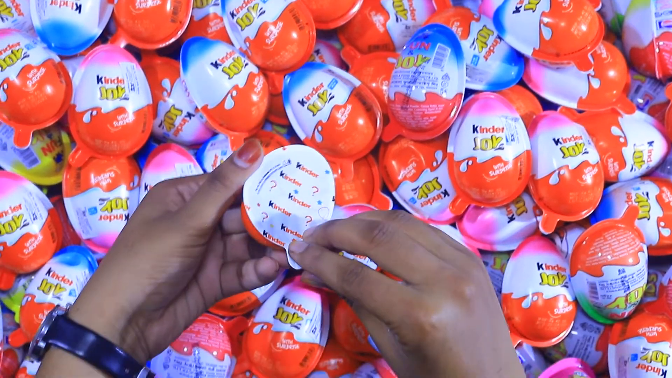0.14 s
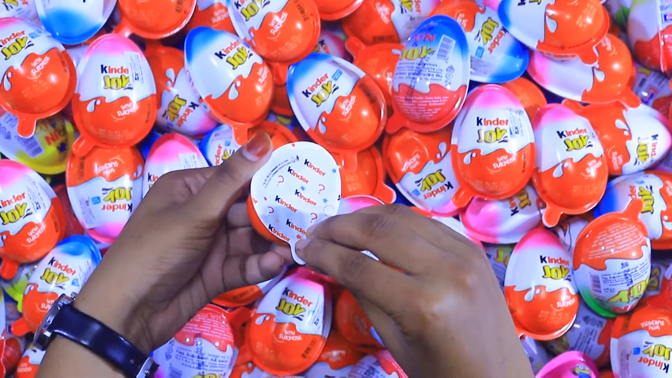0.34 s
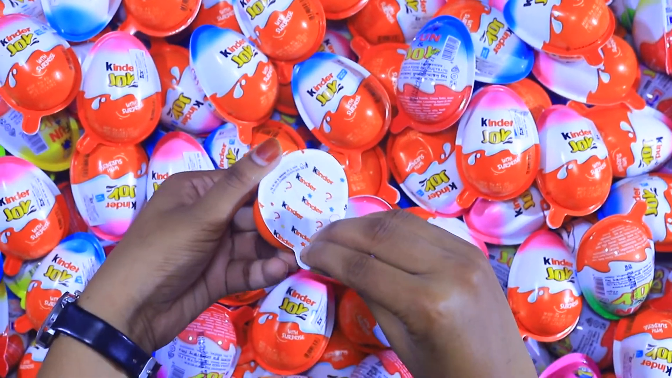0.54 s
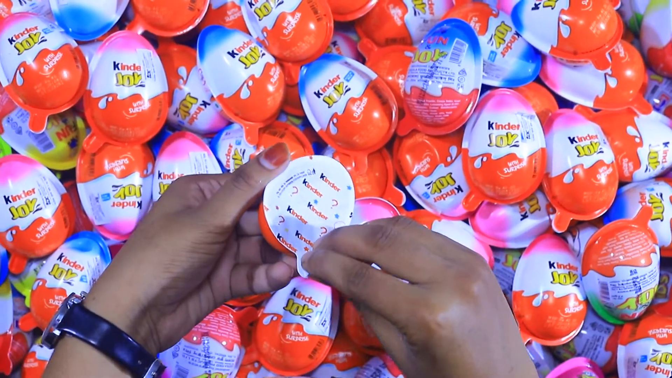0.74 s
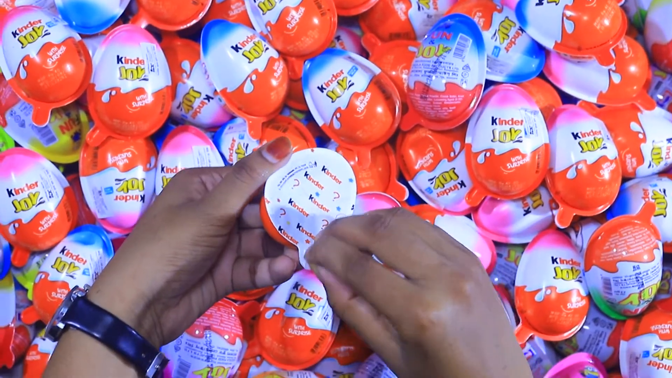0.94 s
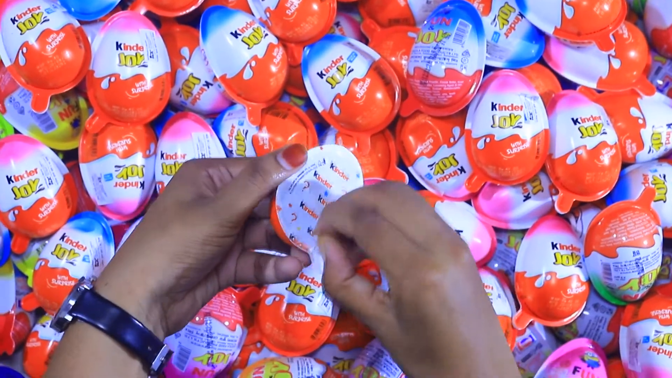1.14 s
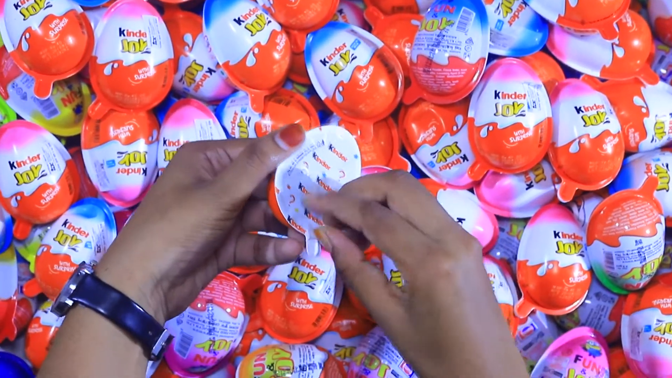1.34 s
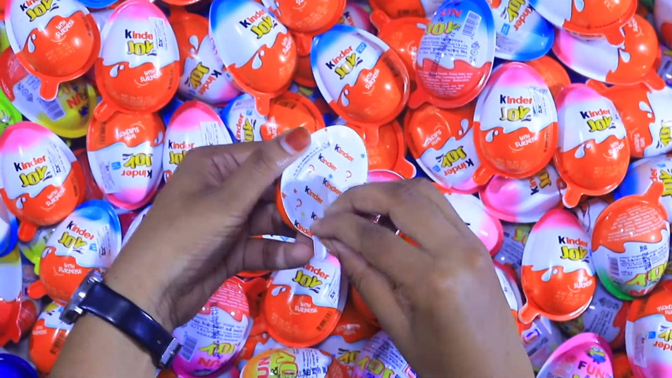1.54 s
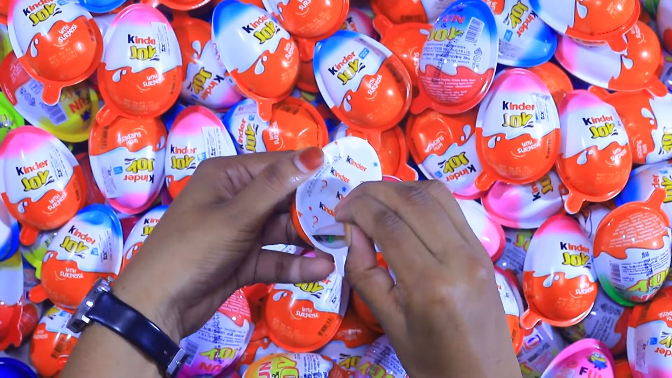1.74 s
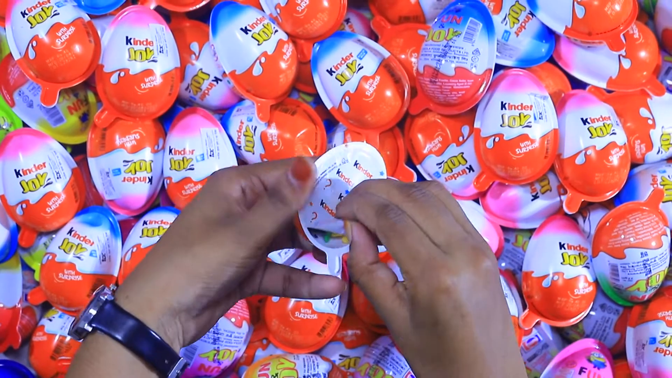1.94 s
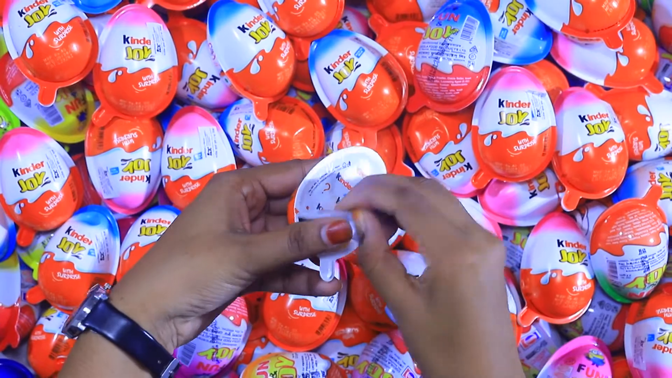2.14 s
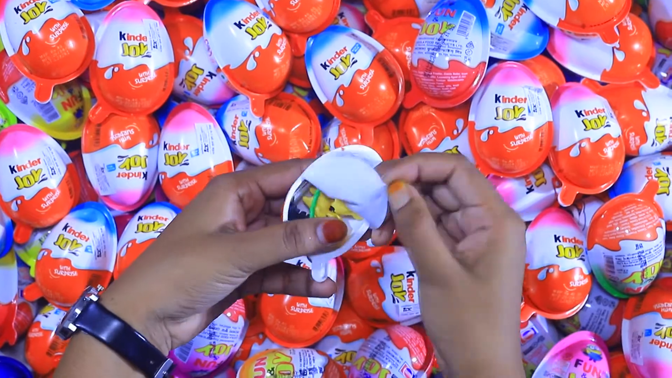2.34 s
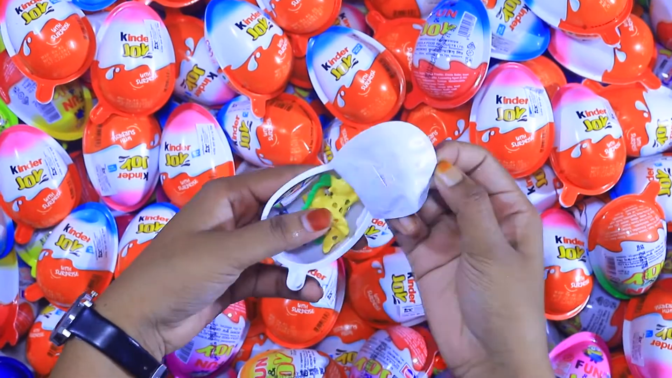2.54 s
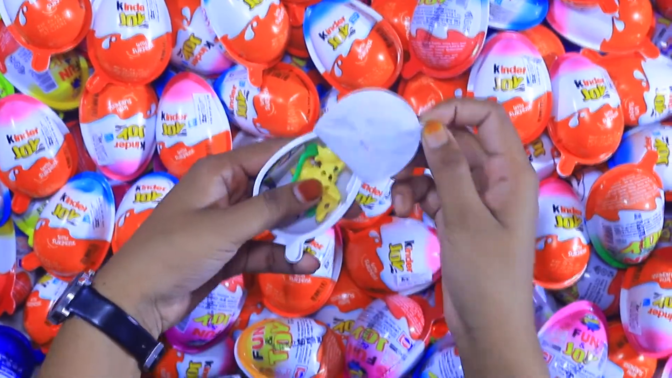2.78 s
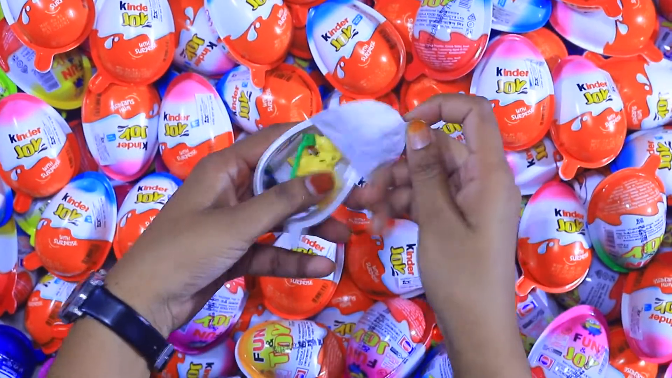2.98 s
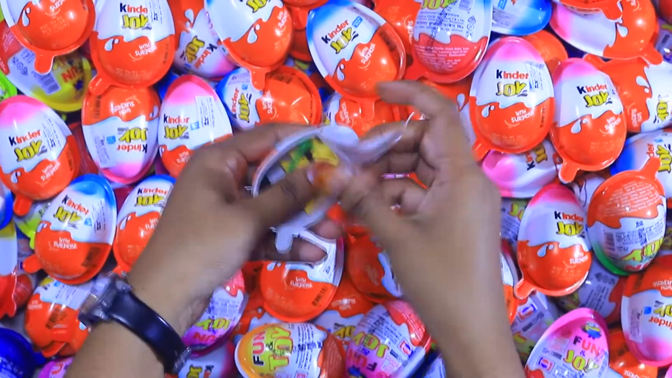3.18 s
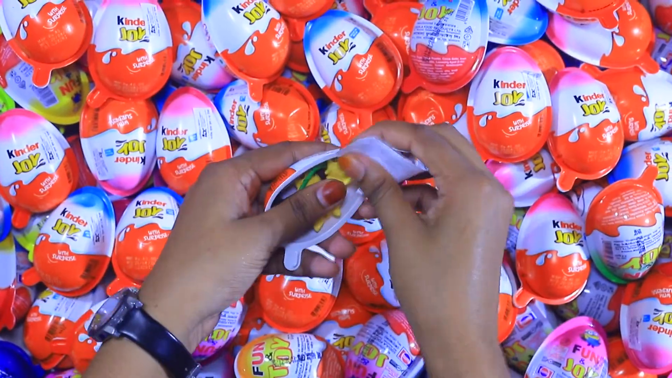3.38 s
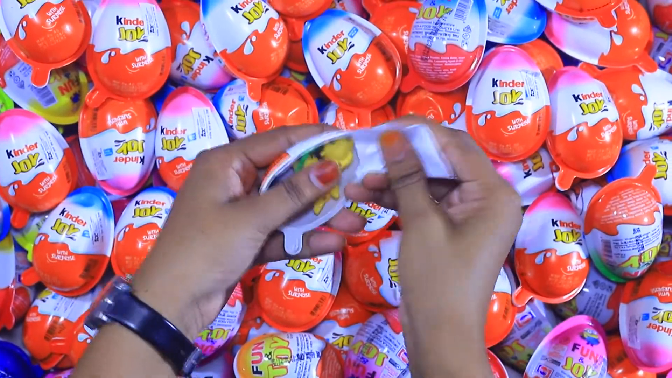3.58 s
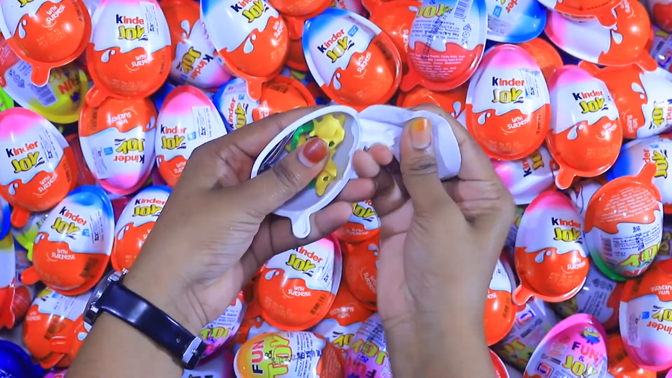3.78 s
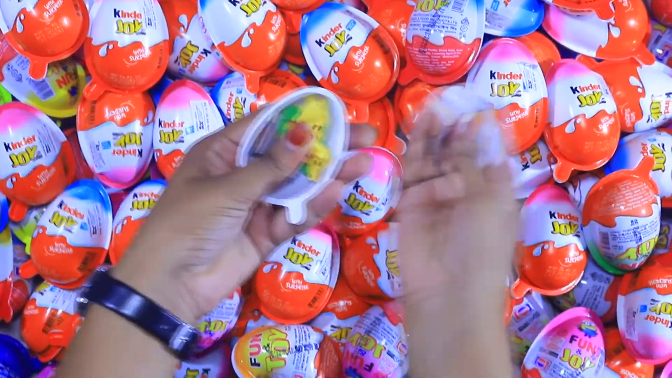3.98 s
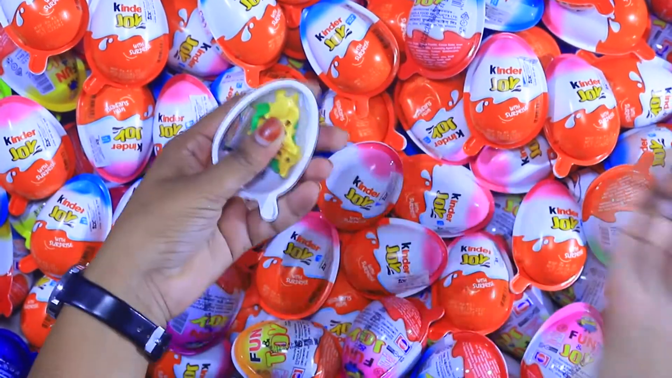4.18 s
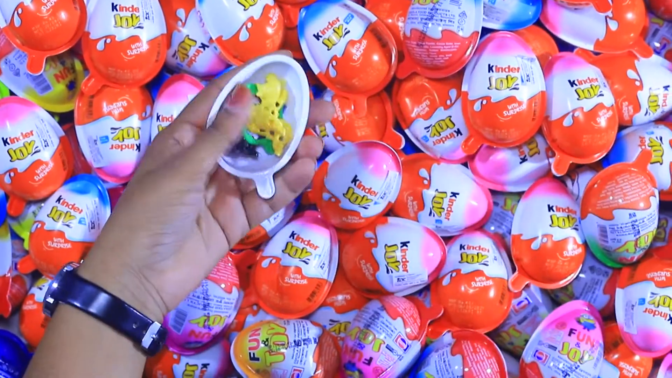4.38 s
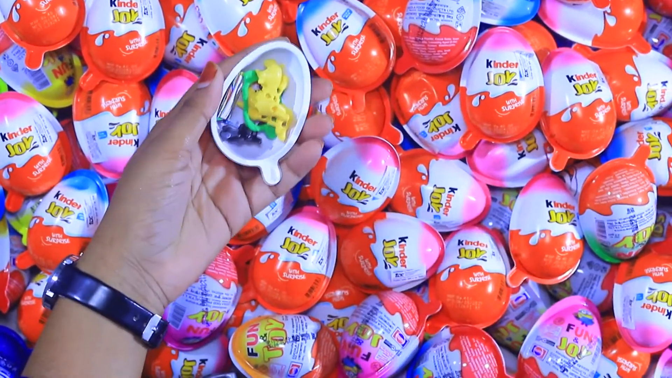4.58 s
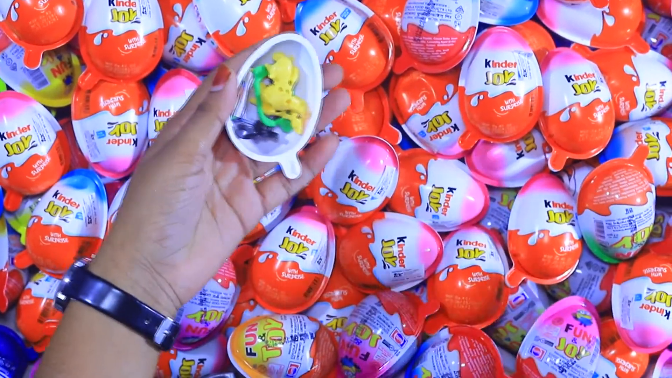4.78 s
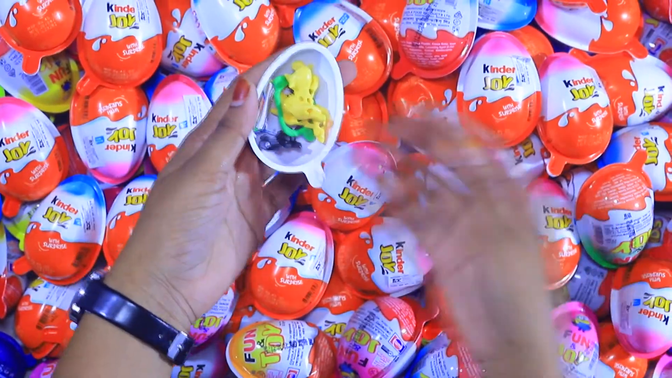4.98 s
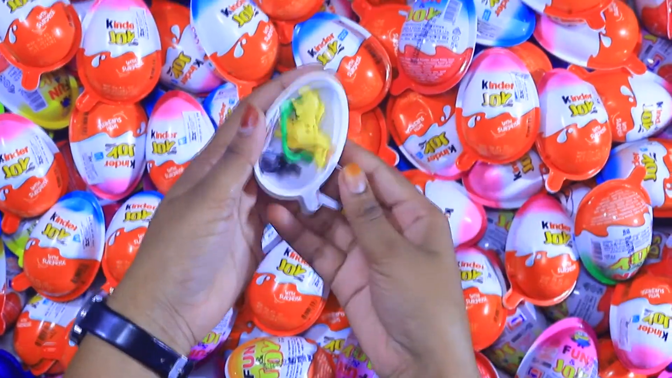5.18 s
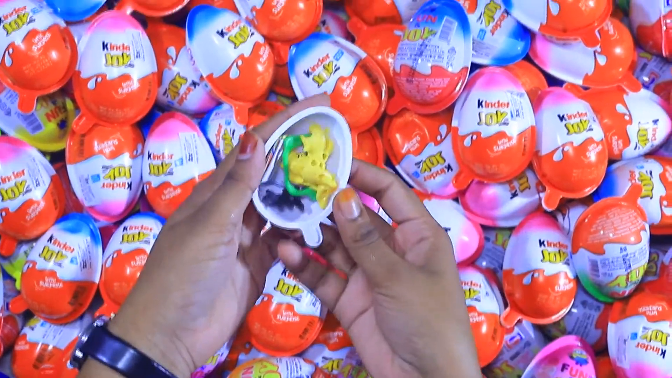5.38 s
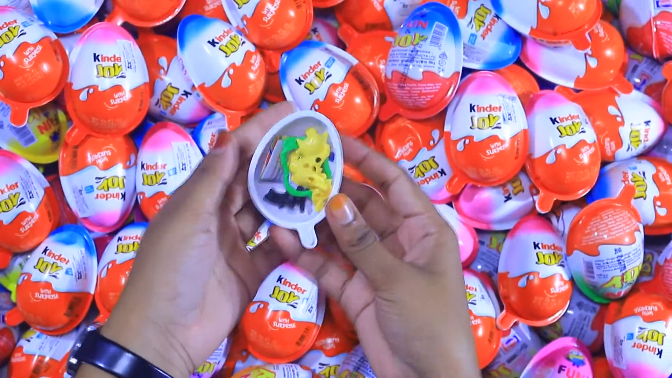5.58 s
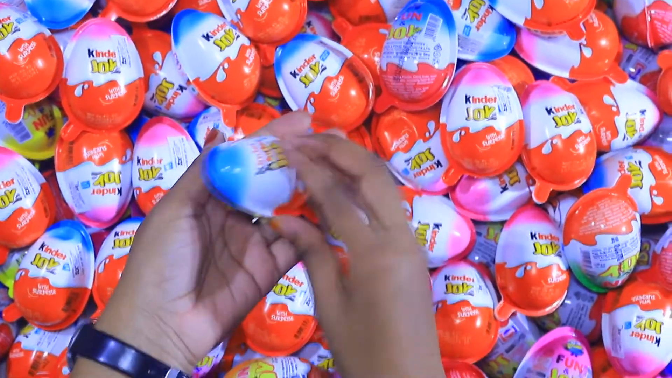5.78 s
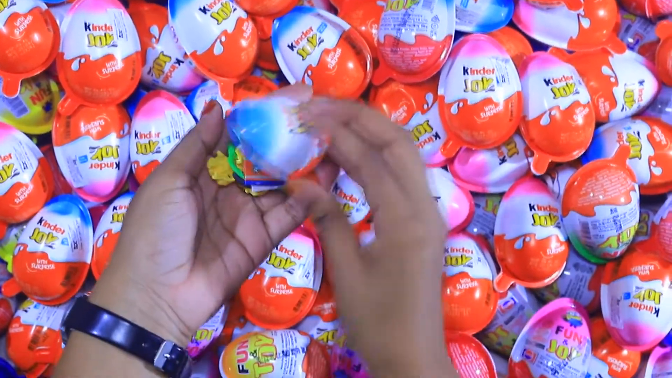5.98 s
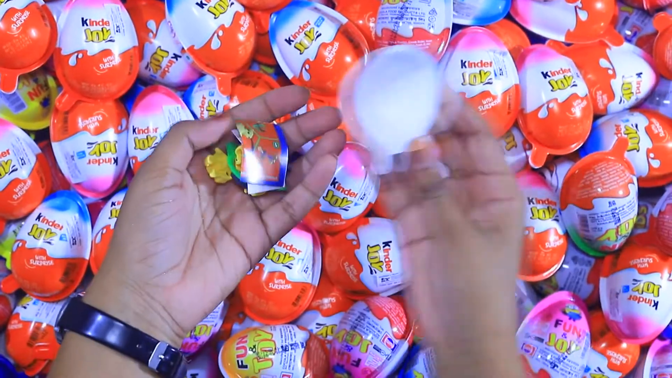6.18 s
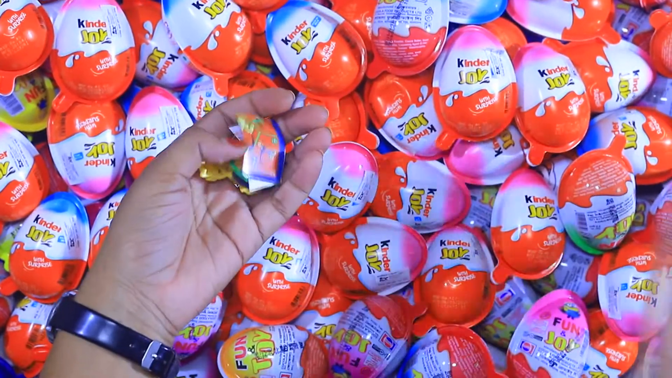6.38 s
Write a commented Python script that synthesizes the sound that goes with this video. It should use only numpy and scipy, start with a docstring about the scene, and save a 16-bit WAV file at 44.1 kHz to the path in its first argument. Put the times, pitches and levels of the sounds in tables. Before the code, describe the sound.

Hands handle a plastic toy egg close to the microphone, slightly to the right, in a bare room with a short echo. Faint ticks start around 0.6 seconds, followed by crisp foil crinkles just after 1 second and a sharp snap at about 1.8. From 2.1 to 2.6 seconds the seal peels away in a dense run of snaps and glue crackle, loudest at the end, where the thin cup rings briefly. Softer crinkles, sliding fingers and dull little bumps follow, with two more sharp snaps at about 3.6 and 4 seconds. A fingernail flicks the rim near 4.2 seconds, then the handling drops to faint ticks, taps and rubbing. At about 5.9 seconds the hard plastic halves click lightly apart. A faint air hiss and a wavering low hum lie underneath.

```python
"""Peeling the foil from a toy egg

Hands open a plastic egg close to the microphones in a bare room. Foil and thin cup snap as they
buckle, and the glue crackles as it lets go. Fingers slide on the cup, bump it and flick its rim,
exciting damped modes; at the end the two hard halves click apart. Air hisses and a low hum wavers."""
import sys
import numpy as np
from scipy import signal
from scipy.fft import rfft, irfft
from scipy.io import wavfile
from scipy.ndimage import uniform_filter1d

SR = 44100
rng = np.random.default_rng(int(sys.argv[2]) if len(sys.argv) > 2 else 0)


def to_wav(s):
    """Save 16-bit WAV."""
    ch = np.atleast_2d(s).T  # columns
    pcm = np.round(np.clip(ch, -1, 1) * 32767)  # PCM
    wavfile.write(sys.argv[1], SR, pcm.astype(np.int16))


N = 283646

# Buckles of foil and cup. Each row: time in seconds, relative level at 3 kHz in dB, body at 1 kHz
# and edge at 8 kHz in dB against that level, ring of the facet in Hz.
BUCKLES = [(0.6474, -29, 0, -19, 1540), (1.0784, -11.5, 0.5, -5.5, 3570), (1.0945, -14, -3, -25, 1740),
           (1.1, -7.5, -12.5, -33, 1460), (1.1803, -23, -10, -11, 3600), (1.183, -14.5, -1.5, -8, 745),
           (1.3521, -25.5, -1, -7, 6560), (1.451, -24, 1, -10, 3680), (1.5306, -19.5, 0.5, -28, 1470),
           (1.629, -25.5, -15, -14, 1880), (1.707, -29.5, 3, -28, 2200), (1.7615, 3.5, -12, -9.5, 1260),
           (2.1381, -4, -16.5, -13, 3180), (2.2014, -6.5, -1, -15, 1320), (2.2083, -23.5, 11.5, -18, 2410),
           (2.2308, -12, -20, -20, 2340), (2.269, -7, -4.5, -22, 1670), (2.2913, -6, -15, -29, 1010),
           (2.3158, -12, -7, -13, 3440), (2.3306, -10.5, -8, -18, 2850), (2.3725, -14.5, 7.5, -15, 1240),
           (2.4175, -0.5, -11, -15, 4520), (2.4194, -3, -9.5, -17, 4910), (2.425, 3.5, -8, -12.5, 5130),
           (2.4807, -19.5, 6, -14, 3880), (2.4934, 2, -19, -14.5, 2290), (2.5217, -9, -5, -22, 2900),
           (2.5322, -4, -14, -24, 1690), (2.55, 1.5, -15, -27, 2900), (2.5572, -13, -4, -18, 1290),
           (2.5697, -24, 13, -17, 4270), (2.5764, 12, -15, -17.5, 4600), (2.7169, -15, -1, -37, 2920),
           (2.9146, -32.5, 14.5, -20, 2900), (3.0556, -14, -14, -21, 5400), (3.1727, -18, -10, -18, 4900),
           (3.3537, -26.5, -10, -17, 2780), (3.3723, -19.5, -6.5, -3, 2740),
           (3.5127, -22.5, -11, -12, 2610), (3.5925, 5, -26.5, -13, 2700), (3.6937, -16.5, 0, -11, 3570),
           (3.7512, -19.5, -16, -6, 3560), (3.8601, -23.5, -6, -4.5, 3160), (3.9896, 2.5, -11, -11.5, 2460),
           (4.323, -20, 0.5, -15, 910), (4.33, -20, -19, -25, 2600), (4.47, -28, -22, -13.5, 4330),
           (4.5102, -42, -1, -6, 2900), (4.6222, -34, 3, 0, 2780), (5.2771, -34.5, 6.5, -8, 2080),
           (5.8542, -27, -7, -14, 1650)]


def amp(db):
    return 10 ** (np.asarray(db) / 20)


def unit_rms(x):
    return x / np.sqrt(np.mean(x ** 2) + 1e-20)


def bins(size=2048):
    return np.fft.rfftfreq(size, 1 / SR)


def curve(points, hz):
    """Interpolation of (Hz, value) points over log frequency."""
    f, value = np.transpose(points)
    return np.interp(np.log(hz + 1), np.log(f + 1), value)


def add(mix, start_s, sound):
    part = mix[round(start_s * SR):][:len(sound)]
    part += sound[:len(part)]


def resonance_db(hz, centre, width, db):
    """The Lorentzian peak or dip of one resonance."""
    return 10 * np.log10(1 + (amp(db) ** 2 - 1) / (1 + (2 * (hz - centre) / width) ** 2))


def minimum_phase(db):
    """The most compact causal pulse with a given spectrum."""
    log_gain = np.log(amp(np.r_[db, db[-2:0:-1]]))
    return np.fft.ifft(np.exp(np.conj(signal.hilbert(log_gain)))).real


def noise(colour):
    """White noise shaped by a spectrum of (Hz, dB) points."""
    return unit_rms(irfft(rfft(rng.standard_normal(N)) * amp(curve(colour, bins(N))), N))


def envelope(rows, attack_s, t60, rest_db=-200):
    """Incoherent events add in power over a resting level; each builds, holds and decays."""
    power = np.full(N, amp(rest_db) ** 2)
    for start, length, db in rows:
        t = np.arange(0, length + t60, 1 / SR)
        level = np.minimum(t / attack_s, 1) * amp(db - 60 * np.maximum(t - length, 0) / t60)
        add(power, max(start, 0), level ** 2)
    return np.sqrt(power)


def hum(waver=0.35):
    """Slow random amplitude modulation makes low tones waver as they come and go."""
    # Each row: start in seconds, length in seconds, level in dB, pitch in Hz.
    tones = [(0, 1.52, -72.5, 98.1), (.38, 0.55, -71.5, 121), (1.7, 3.47, -75, 83.66)]
    out, t = np.zeros(N), np.arange(N) / SR
    for start, length, db, hz in tones:
        drift = 1 + waver * unit_rms(signal.resample(rng.standard_normal(40), N))
        level = envelope([(start, length, db)], attack_s=0.04, t60=0.63)
        out += np.sqrt(2) * level * drift * np.sin(2 * np.pi * hz * t)
    return out


def background(air_db=-69, width=0.84, mains_db=-77, left_db=2.3):
    """Partly correlated air noise sounds wide; coherent rumble and hum lean to the left."""
    # Spectrum of the room air. Each row: frequency in Hz, relative level in dB.
    air_colour = [(20, -28), (45, -15), (70, -5), (120, 0), (175, -4), (250, -6.5), (400, -6.5), (700, -12),
                  (1200, -13.5), (2500, -20), (5000, -19.5), (9000, -27), (12700, -33), (14000, -50.5)]
    rumble = noise([(25, -46.5), (40, -12.5), (54, 3.5), (68, -14), (200, -47), (2000, -100)])
    rumble *= envelope([(4.45, 0.33, -67.5)], attack_s=0.067, t60=0.6, rest_db=-78.5)  # the cup turns
    mains = amp(mains_db) * np.sin(2 * np.pi * 200 * np.arange(N) / SR)
    low = (rumble + hum() + mains) * amp([[left_db], [-left_db]])
    middle, side = noise(air_colour), width * noise(air_colour)
    return low + amp(air_db) * np.array([middle + side, middle - side]) * amp([[0.6], [-0.6]])


def room_response(first_s=0.004, build_s=0.00075, scatter_db=3, per_s=5000):
    """A diffuse field: random reflections, alike at both sides only in the bass, decay band by band."""
    # Reverberation times. Each row: frequency in Hz, t60 in seconds.
    decay_times = [(250, 0.6), (660, 0.48), (1740, 0.56), (4600, .5), (8000, 0.4563), (12000, 0.35)]
    # Coherence of the echoes. Each row: frequency in Hz, correlation of left and right.
    coherence = [(100, 1), (400, 0.99), (900, 0.051), (1800, 0), (4000, 0), (14000, 0.066)]
    shape = (2, SR)
    taps = rng.choice([-1., 1.], shape) * (rng.random(shape) < per_s / SR)
    taps *= amp(scatter_db * rng.standard_normal(shape))
    taps *= 1 - np.exp(-np.maximum(np.arange(SR) / SR - first_s, 0) / build_s)
    hz, t, (left, other) = signal.stft(taps, SR, nperseg=256)
    alike = curve(coherence, hz)[:, None]
    pair = np.array([left, alike * left + np.sqrt(1 - alike ** 2) * other])
    tail = signal.istft(pair * amp(-60 * t / curve(decay_times, hz)[:, None]), SR)[1]
    return tail / np.linalg.norm(tail, axis=1, keepdims=True)


def room(x, patterns=5, changes_per_s=7):
    """Time-varying reverberation: as the egg turns, one pattern of reflections fades into the next."""
    # Spectrum of the echoes. Each row: frequency in Hz, gain in dB.
    echo_colour = [(150, -0.5), (500, 6.5), (1200, 3.5), (3000, -0.5), (6000, 4), (9000, 3.5),
                   (13000, -0.5)]
    coloured = signal.oaconvolve(x, minimum_phase(curve(echo_colour, bins())))[:N]
    turn = np.arange(N) / SR * changes_per_s
    shares = [np.sin(np.pi / 2 * np.minimum((turn - k) % patterns, 2)) for k in range(patterns)]
    return sum(signal.fftconvolve((coloured * share)[None], room_response(), axes=1)[:, :N]
               for share in shares)


def handling():
    """Moving hands make a soft rustle: low noise whose amplitude follows the motion."""
    # Each row: start in seconds, length in seconds, level in dB.
    moves = [(1.4, 0.33, -71), (2.08, 0.32, -65), (2.65, 0.79, -68.5), (4.35, .4, -68.5),
             (5.55, 0.16, -71.5), (6.08, .15, -70.5)]
    colour = [(40, -31.5), (90, -12), (130, -1), (175, 1), (230, -9.5), (400, -28.5), (2000, -55)]
    return noise(colour) * envelope(moves, attack_s=0.067, t60=0.6, rest_db=-73.5)


def rubbing(grip_db=4.5):
    """Stick-slip friction of skin on the cup gives an uneven hiss."""
    # Spectrum of sliding skin. Each row: frequency in Hz, relative level in dB.
    skin_colour = [(100, 5), (400, 2.5), (1400, 0.5), (2800, 2), (5000, -9), (9000, -17.5), (14000, -33.5)]
    # Each row: start in seconds, length in seconds, level in dB.
    slides = [(.19, 0.028, -68), (1.52, 0.12, -65.5), (2.8, 0.28, -67.5), (4.15, 0.16, -69.5),
              (4.44, 0.18, -73), (5.26, 0.05, -68.5), (5.81, 0.023, -74)]
    grip = unit_rms(uniform_filter1d(rng.standard_normal(N), size=400))
    hiss = unit_rms(noise(skin_colour) * amp(grip_db * grip))
    return hiss * envelope(slides, attack_s=0.02, t60=0.53, rest_db=-78)


def finger_bumps(rise_s=0.0008, sag=0.062, sag_s=0.00248, cycles=11.2):
    """Constant-Q damping: the hand stops every low knock within the same number of cycles."""
    # Each row: time in seconds, level in dB, pitch in Hz.
    bumps = [(0.896, -45, 480), (1.551, -41, 413), (1.56, -45.5, 119), (1.184, -33, 750), (2.577, -41, 264),
             (3.005, -48.5, 174), (3.056, -49, 183), (3.695, -47, 730), (3.991, -47, 254),
             (4.322, -52, 330), (4.9, -54, 297), (5.073, -53, 199), (5.155, -46, 286), (5.199, -50.5, 247)]
    out, t = np.zeros(N), np.arange(SR // 5) / SR
    for start, db, hz in bumps:
        t60 = cycles / hz
        phase = 2 * np.pi * np.cumsum(hz * (1 + sag * np.exp(-t / sag_s))) / SR
        add(out, start, amp(db - 60 * t / t60) * (1 - np.exp(-t / rise_s)) * np.sin(phase))
    return out


def rim_pings(rise_s=0.0011, ring_t60=0.011, tick_db=-9, tick_t60=0.016):
    """Plucking: a fingernail slips off the stiff rim with a tick and excites one damped mode."""
    # Each row: time in seconds, level in dB, pitch in Hz.
    pings = [(0.5928, -37.5, 7090), (0.858, -53, 7000), (0.8952, -36.5, 4920), (4.23, -26, 3680),
             (4.6504, -46, 2770), (4.7244, -45, 2940)]
    out, t = np.zeros(N), np.arange(SR // 20) / SR
    bandpass = signal.butter(1, [1500, 7000], "band", fs=SR)
    for (start, db, hz), scrape in zip(pings, rng.standard_normal((len(pings), len(t)))):
        ring = (1 - np.exp(-t / rise_s)) * amp(-60 * t / ring_t60) * np.sin(2 * np.pi * hz * t)
        tick = signal.lfilter(*bandpass, scrape) * amp(tick_db - 60 * t / tick_t60)
        add(out, start, amp(db) * (ring + tick))
    return out


def shell_clicks(crack_db=-4, crack_t60=0.028):
    """Impulsive excitation: the hard halves catch and let go with a crack and bright modes."""
    # Each row: time in seconds, level in dB.
    clicks = [(5.874, -40), (5.8834, -36)]
    # Modes of the hard plastic. Each row: frequency in Hz, relative level in dB, t60 in seconds.
    rim_modes = [(3020, -3.5, 0.014), (3630, -7, 0.0069), (4190, -6, 0.033), (6130, -10.5, 0.018),
                 (7350, -14, .02), (8240, -27, 0.0091), (9700, -8, .022), (10200, -4, 0.016),
                 (12000, -15, 0.024)]
    out, t = np.zeros(N), np.arange(SR // 8) / SR
    ring = sum(amp(db - 60 * t / t60) * np.sin(2 * np.pi * (hz * t + rng.random()))
               for hz, db, t60 in rim_modes)
    highpass = signal.butter(2, 2000, "high", fs=SR)
    for start, db in clicks:
        hiss = signal.lfilter(*highpass, rng.standard_normal(len(t)))
        add(out, start, amp(db) * (ring + hiss * amp(crack_db - 60 * t / crack_t60)))
    return out


def cup_ring(start_s=2.5765, gain_db=1):
    """Free vibration: the cup rings on for a moment as the seal tears away."""
    # Each row: frequency in Hz, relative level in dB, t60 in seconds.
    free_modes = [(2908, -41, .46), (2954, -44, .44), (3065, -42, .42), (4505, -51, .36), (4829, -49, .33)]
    out, t = np.zeros(N), np.arange(SR // 2) / SR
    for hz, db, t60 in free_modes:
        add(out, start_s, amp(gain_db + db - 60 * t / t60) * np.sin(2 * np.pi * hz * t))
    return out


def cup_db(hz):
    """The cup with its lid acts as a resonant filter."""
    # Each row: centre in Hz, width in Hz, gain in dB.
    resonances = [(700, 69, 2), (1300, 1100, 3), (1980, 360, -1.5), (2320, 45.5, 3.5), (3020, 400, -2.5),
                  (4590, 500, 1.5)]
    return sum(resonance_db(hz, *mode) for mode in resonances)


def glue_crackle(per_s=170, spread_db=5, attack_s=0.045, settle_db=-65.5):
    """A Poisson process: threads of glue and small creases give way, a few much louder than the rest."""
    # Spectrum of one tick. Each row: frequency in Hz, relative level in dB.
    tick_colour = [(100, -37), (350, 1), (700, -2.5), (1400, -1), (2800, 4), (4600, 1.5), (7000, -13),
                   (10000, -14.5), (14000, -34.5)]
    # Pulls and squeezes. Each row: start in seconds, length in seconds, level in dB.
    pulls = [(1.56, 0.043, -55.5), (2.19, 0.22, -63), (2.51, 0.067, -45), (2.8, 0.11, -70),
             (3.16, 0.083, -67.5), (3.34, 0.19, -66.5), (3.66, 0.36, -69), (4.13, 0.092, -71),
             (4.45, 0.25, -72)]
    size = amp(spread_db * np.minimum(rng.exponential(1, N), 3)) * rng.choice([-1, 1], N)
    ticks = size * (rng.random(N) < per_s / SR)
    pulse = minimum_phase(curve(tick_colour, bins()) + cup_db(bins()))
    pulling = envelope(pulls, attack_s, t60=0.26, rest_db=-86.5)  # mere holding crackles faintly
    settling = envelope([(start, 0, db + settle_db) for start, db, *_ in BUCKLES], attack_s, t60=0.78)
    return unit_rms(signal.oaconvolve(ticks, pulse)[:N]) * np.hypot(pulling, settling)


def buckling(flutter=0.81, flutter_t60=0.015, strain_db=-15, strain_t60=0.011, gain_db=2):
    """Snap-through: a facet creaks under strain, flips and rings. Returns direct sound and room feed."""
    direct, to_room = np.zeros((2, N))
    hz, t = bins(), np.arange(SR // 40) / SR
    impulse, shape = t == 0, (len(BUCKLES), len(t))
    creases = rng.standard_normal(shape) * amp(-60 * t / flutter_t60) * (1 - np.exp(-t / 0.000081))
    strains = rng.standard_normal(shape) * amp(-60 * t[::-1] / strain_t60)
    for (start, db, body_db, edge_db, ring_hz), shake, strain in zip(BUCKLES, creases, strains):
        colour = curve([(80, body_db - 22), (300, body_db - 11), (1000, body_db),
                        (3000, 0), (8000, edge_db), (15000, edge_db - 13)], hz)
        width_hz = 560 * amp(0.071 * (db + 14))  # a hard buckle loses its ring sooner
        facet = resonance_db(hz, ring_hz, width_hz, db=6 - 0.19 * db)
        pulse = minimum_phase(gain_db + db + colour + facet + cup_db(hz))
        rustle = flutter * amp(-0.25 * db)  # nearby creases shake; a gentle buckle is mostly rustle
        flip = impulse + rustle * shake / np.linalg.norm(shake)
        creak = amp(strain_db) * signal.fftconvolve(pulse, strain / np.linalg.norm(strain))
        add(direct, start - t[-1], creak)
        add(direct, start, signal.fftconvolve(pulse, flip / np.linalg.norm(flip)))
        spread = impulse + 0.33 * (flip - impulse)  # over all directions the rustle partly evens out
        radiation = amp(0.033 * db)  # a hard buckle shakes the whole cup, sending more into the room
        add(to_room, start, radiation * signal.fftconvolve(pulse, spread / np.linalg.norm(spread)))
    return np.array([direct, to_room])


def scene(snap_db=-3, room_db=-1, left_lag_s=0.00003, bump_echo_db=-7, rim_echo_db=-4, echo_lean=0.38):
    """Direct and reverberant sound add; time and level differences set the hands a little to the right."""
    # Balance of the direct sound. Each row: frequency in Hz, left minus right in dB.
    balance = [(150, 1), (500, 2), (1200, 1), (2200, -4), (5000, -4), (9000, 0), (13000, -4.5)]
    snaps, snaps_to_room = amp(snap_db) * buckling()
    peeling = cup_ring() + glue_crackle() + rubbing()
    rims = shell_clicks() + rim_pings()
    knocks = finger_bumps()
    hz = bins(N)
    lean_db = np.outer([0.5, -0.5], curve(balance, hz))
    delay = np.exp(-2j * np.pi * np.outer([left_lag_s, 0], hz))
    direct = rfft(snaps + peeling + rims + knocks + handling()) * amp(lean_db) * delay
    to_room = snaps_to_room + peeling + amp(rim_echo_db) * rims + amp(bump_echo_db) * knocks
    reverberant = rfft(room(to_room)) * amp(room_db + echo_lean * lean_db)
    return irfft(direct + reverberant, N) + background()


def record(dry, cutoff_hz=14500):
    """A linear-phase low-pass filter limits the bandwidth."""
    lowpass = signal.firwin(255, cutoff_hz, window=("kaiser", 8), fs=SR)
    return signal.oaconvolve(dry, lowpass[None], "same")


dry = scene()
out = record(dry)
to_wav(out)
```